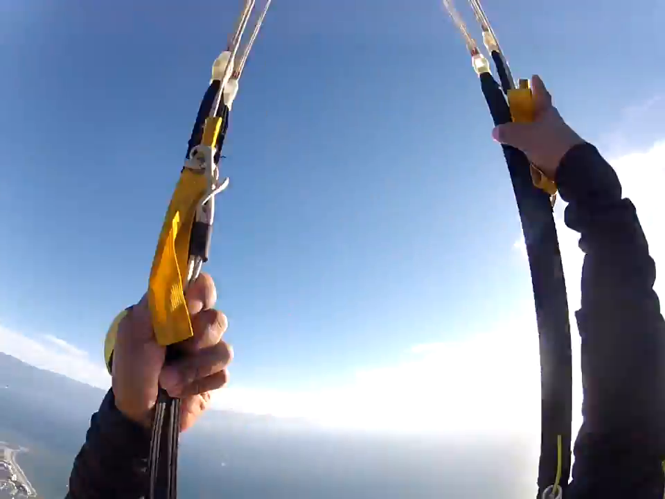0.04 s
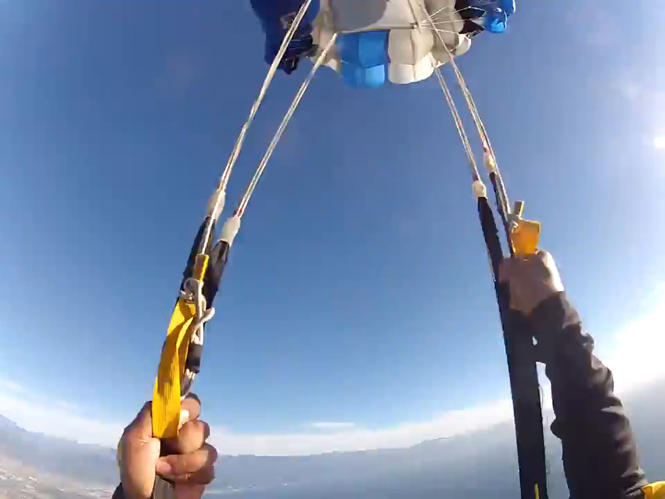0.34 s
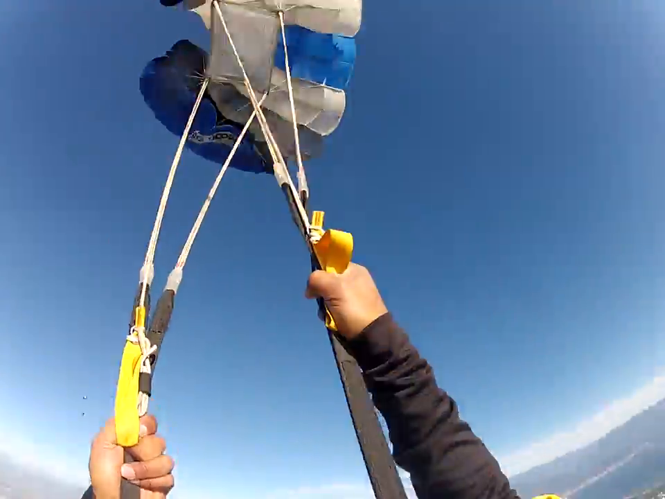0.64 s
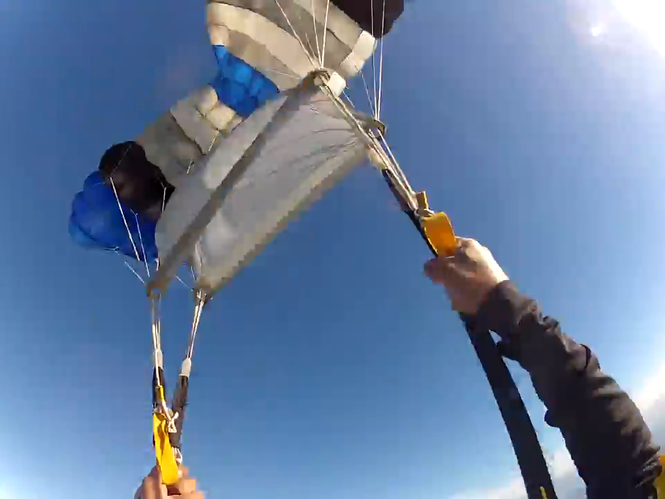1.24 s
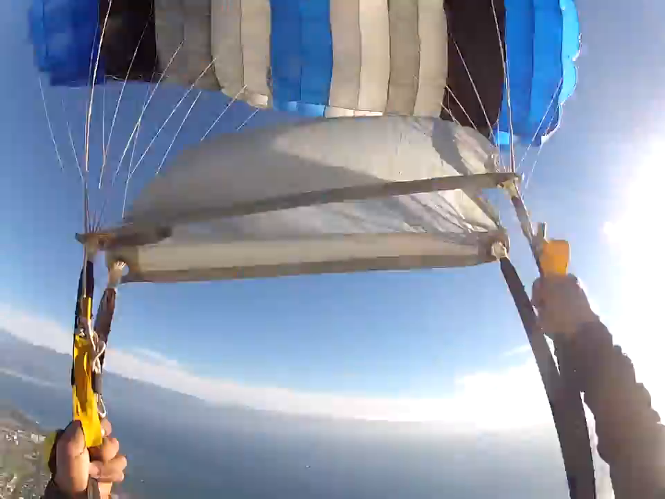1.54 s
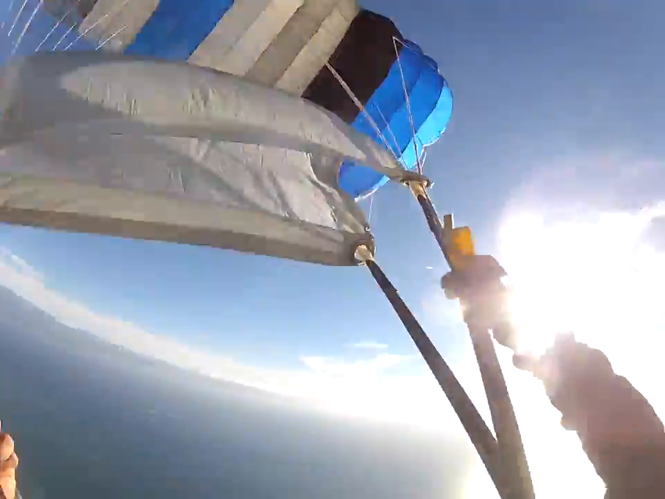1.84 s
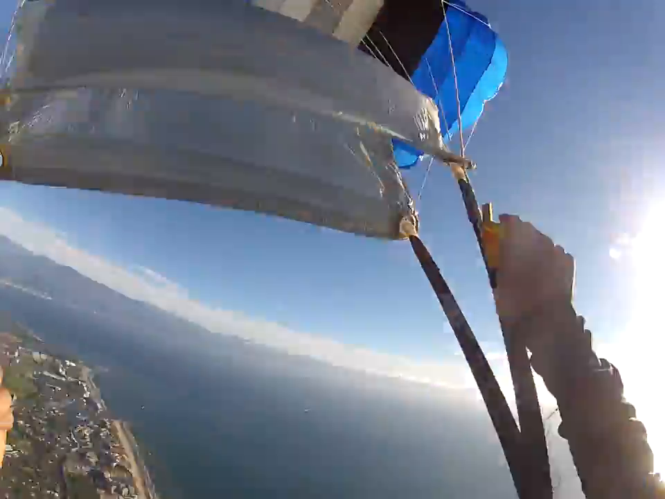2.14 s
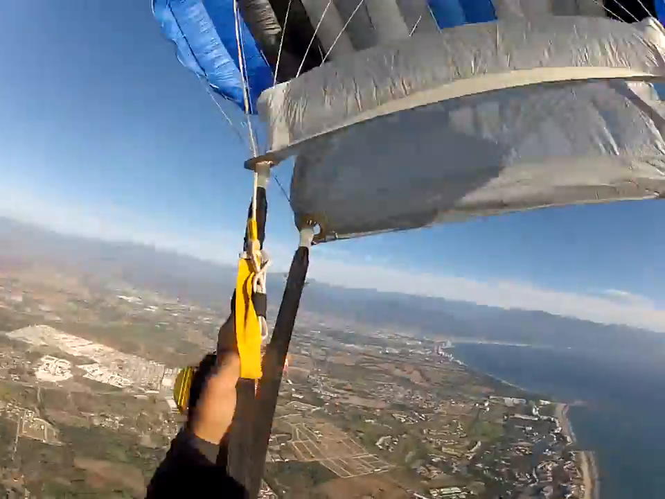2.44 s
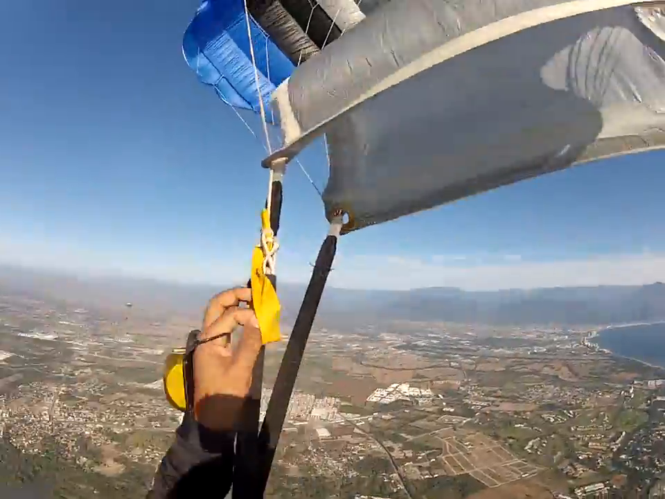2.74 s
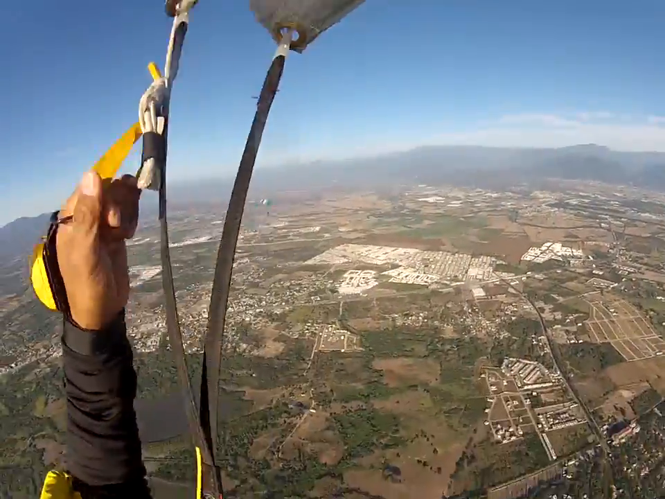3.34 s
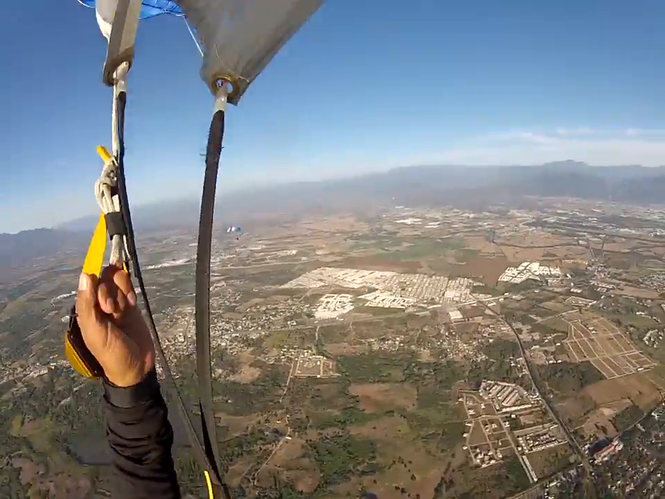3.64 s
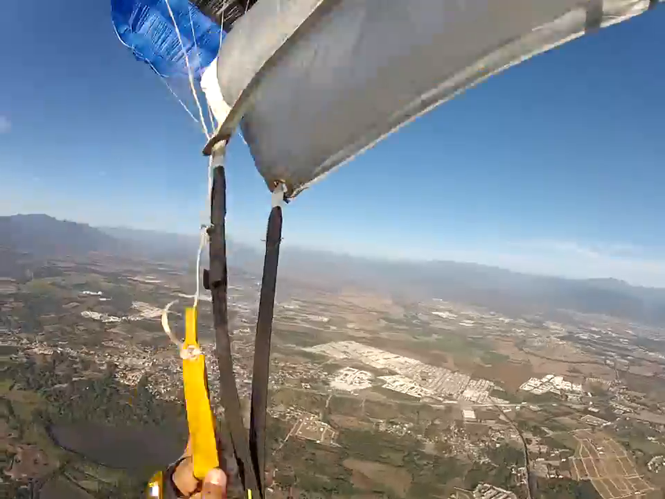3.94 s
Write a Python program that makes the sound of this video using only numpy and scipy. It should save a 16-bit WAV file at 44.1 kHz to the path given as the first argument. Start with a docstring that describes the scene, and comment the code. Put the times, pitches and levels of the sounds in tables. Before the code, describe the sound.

Wind buffets the microphone, opening with a dull thump while parachute cloth flaps and crackles. At about 0.8 seconds gear rattles sharply against the camera. The wind drops by 1.5 seconds, leaving soft rustling, strap rubs and light ticks. From around 2.8 seconds the air picks up to a steady rush with a faint whistle, and the harness knocks the helmet near 3.4 seconds.

```python
"""Under a parachute that has just opened, at one microphone in a hard camera case on the jumper's helmet.
Turbulent eddies buffet the case, and the fluttering cloth flaps, crackles and calms as the fall slows.
Gear rattles on the case and the harness bumps the helmet, exciting damped modes; straps rub, lines tick.
Then the airflow picks up again to a steady rush, singing faintly at an edge of the case."""
import sys
import numpy as np
from scipy import signal
from scipy.fft import rfft, irfft
from scipy.io import wavfile
from scipy.ndimage import uniform_filter1d

SR = 44100
rng = np.random.default_rng(int(sys.argv[2]) if len(sys.argv) > 2 else 0)


def store_pcm(level_fs):
    """Save levels as 16-bit WAV."""
    pcm = np.round(np.clip(level_fs, -1, 1) * 32767).astype(np.int16)
    wavfile.write(sys.argv[1], SR, np.atleast_2d(pcm).T)


N = 176400

# Strength of the buffeting. Each row: time in seconds, level in dB.
BUFFET_LEVELS = [(0, -16), (.08, -17.5), (.3, -17.5), (.48, -23.5), (.63, -18.5), (.71, -28), (.77, -34.5),
                 (.8, -27), (.83, -21), (.89, -22.5), (1.0, -27.5), (1.12, -34), (1.28, -31), (1.4, -31.5),
                 (1.48, -44), (1.62, -41.5), (1.8, -47), (2.02, -42), (2.19, -35.5), (2.43, -43.5),
                 (2.48, -33.5), (2.58, -45.5), (2.69, -41.5), (2.76, -30), (2.97, -30.5), (3.2, -31.5),
                 (3.34, -43), (3.6, -40), (3.73, -45.5), (3.85, -34), (3.94, -28), (4, -37)]
# Spectrum of the eddies. Each row: frequency in Hz, relative level in dB.
EDDY_SPECTRUM = [(10, -40), (22, -3), (60, 2), (100, -5), (190, -12), (290, -19.5), (420, -32),
                 (600, -32.5), (1200, -66.5)]

def buffeting(evenness=.31, swirl_db=1.8):
    """Turbulent pressure fluctuation: eddies press on the case with a rumble that follows the flow."""
    eddies = unit(colour(rng.standard_normal(N + SR), EDDY_SPECTRUM)[SR:])
    strength = np.sqrt(uniform_filter1d(eddies ** 2, size=2600))
    rumble = unit(eddies / strength ** evenness)  # partly levels out the chance swells
    return rumble * undb(swirl_db * walk(25.04)) * curve(BUFFET_LEVELS)


# Blows of air. Each row: start in seconds, peak in dB, decay time in seconds.
AIR_BLOWS = [(0.025, 2.5, 0.019), (.096, -8, 0.0075), (.82, -13.5, 0.052)]
# Spectrum of a blow. Each row: frequency in Hz, relative level in dB.
BLOW_SPECTRUM = [(20, -43), (65, 3.5), (160, 1), (280, -16.5), (600, -24.5), (6000, -64)]

def thumps(rise_s=.0012):
    """Pressure transients: sudden blows of air load the case and sound as dull thumps."""
    at, db, length = np.array(AIR_BLOWS).T
    t = np.arange(SR // 6) / SR
    push = noises(at, t) * np.minimum(t / rise_s, 1) * np.exp(-(t / length[:, None]) ** 2)
    return place(at, peaked(colour(push, BLOW_SPECTRUM), db))


# Gear striking the case. Each row: start in seconds, peak of the ringing in dB.
GEAR_KNOCKS = [(0.7995, -30), (0.814, -8.5), (0.8282, -3), (0.8375, -3), (0.8486, -13.5), (0.8545, -15),
               (0.863, -14), (0.8692, -12.5), (0.874, -11), (0.8767, -14), (0.8818, -14), (0.8838, -14)]
# Modes of the case. Each row: frequency in Hz, relative level in dB, 60 dB decay time in seconds.
CASE_MODES = [(580, -18, .03), (830, -21, .028), (1090, -10.5, .04), (1760, -1, .014), (2050, -2.5, .012),
              (2460, -11, .011), (3220, -13, .011), (4610, -18, .011), (5420, -20, .01), (6560, -21, .01),
              (10100, -7.5, .007), (13900, -10.5, .0065)]
# Spectrum of the crack of contact. Each row: frequency in Hz, relative level in dB.
IMPACT_SPECTRUM = [(400, -3.5), (600, 4), (2400, 12), (3600, -6.5), (6000, -8), (14000, -6)]

def rattle(contact_s=.0004, crack_db=-5.5, crack_fall_s=.0038):
    """Impact excitation: each blow of hard gear cracks, scrapes and rings the same modes of the case."""
    at, db = np.array(GEAR_KNOCKS).T
    t = np.arange(SR // 10) / SR
    body = ring(CASE_MODES, t) * (1 - np.exp(-t / contact_s))
    touch = contact(at, t, scrape_db=-20, scrape_s=.0016)
    ringing = signal.fftconvolve(touch, body[None], axes=1)
    crack = colour(noises(at, t) * np.exp(-t / crack_fall_s), IMPACT_SPECTRUM)
    return place(at, peaked(ringing, db)) + place(at, peaked(crack, db + crack_db))


# Strength of the flutter. Each row: time in seconds, level in dB.
FLUTTER_LEVELS = [(0, -23.5), (.08, -31.5), (.12, -27), (.19, -27.5), (.27, -34), (.35, -34), (.41, -31.5),
                  (.51, -43.5), (.56, -33), (.68, -50.5), (.78, -47.5), (.95, -55), (1.01, -34), (1.2, -52),
                  (1.38, -42), (1.56, -49.5), (1.65, -59.5), (2.0, -61.5), (2.36, -50.5), (2.65, -61.5),
                  (3.02, -45), (3.3, -47), (4, -47)]
# Spectra of fine creases and of crisp folds. Each row: frequency in Hz, relative level in dB.
CREASE_SPECTRUM = [(120, -15.5), (350, 6), (700, -5), (1200, 3.5), (2200, 5), (3100, -3), (4800, -13),
                   (7400, -14.5), (10000, -8.5), (15000, -22)]
FOLD_SPECTRUM = [(800, -2), (2500, 7.5), (3800, -2.5), (5000, -0.5), (9000, -7.5), (15000, -8.5)]
# Peaks of the rustle. Each row: centre in Hz, width in Hz, gain in dB.
RUSTLE_PEAKS = [(5400, 120, 6.5), (6560, 150, 6)]

def flutter(surge_db=2.5, crinkle_db=-9.5):
    """Superposed impulses: tiny creases merge into a surging rustle; crisper crinkles stand out."""
    creases = grains(per_s=3500, spread_db=4) * undb(surge_db * walk(130))
    crinkles = grains(per_s=90, spread_db=2.2)
    rustle = unit(colour(creases, CREASE_SPECTRUM, RUSTLE_PEAKS))
    crisp = unit(colour(crinkles, FOLD_SPECTRUM, RUSTLE_PEAKS))
    return (rustle + undb(crinkle_db) * crisp) * curve(FLUTTER_LEVELS)


# Cloth snapping taut. Each row: start in seconds, level in dB, time until the decay in seconds.
CLOTH_SNAPS = [(0.026, -16, 0.0083), (0.036, -13, 0.0097), (0.222, -21.5, 0.0079), (0.26, -21, 0.015),
               (0.388, -24, 0.0042), (1.591, -35, 0.0038), (1.770, -41.5, 0.0048), (2.196, -46, 0.0073)]

def flaps(rise_s=.0017, fall_s=.0021):
    """Sudden tension: a panel snaps taut and radiates a short burst of cloth noise."""
    at, db, length = np.array(CLOTH_SNAPS).T
    t = np.arange(SR // 8) / SR
    cloth = unit(colour(noises(at, t), CREASE_SPECTRUM, RUSTLE_PEAKS))
    envelope = np.minimum(t / rise_s, 1) * np.exp(-np.maximum(t - length[:, None], 0) / fall_s)
    return place(at, cloth * envelope * undb(db)[:, None])


# Strength of the rush. Each row: time in seconds, level in dB.
RUSH_LEVELS = [(0, -29.5), (.3, -33), (.6, -41), (.77, -48), (.92, -36.5), (1.02, -35), (1.2, -42.5),
               (1.58, -56), (1.65, -57.5), (1.85, -55), (2.2, -51), (2.38, -51), (2.66, -61.5), (2.77, -45),
               (2.95, -44.5), (3.3, -40), (4, -42.5)]
# Spectrum of the passing air. Each row: frequency in Hz, relative level in dB.
AIRFLOW_SPECTRUM = [(120, 10), (330, -0.5), (700, -2.5), (1200, 5), (1800, 2), (2400, 2.5), (3200, -8),
                    (4800, -14), (7400, -18.5), (10000, -10), (15000, -19)]

def rush(swirl_db=.6, flicker_db=.9):
    """Broadband flow noise: air streams past, its bands swirling together and flickering alone."""
    swirl = swirl_db * walk(45)
    spectrum = rfft(rng.standard_normal(N))
    hz = np.arange(1, len(spectrum) + 1) * SR / N
    octave = np.clip(np.floor(np.log2(hz / 250)), 0, 5)
    air = 0
    for k in np.unique(octave):
        band = irfft(spectrum * (octave == k), N)
        air += band * undb(swirl + flicker_db * walk(30))
    return unit(colour(air, AIRFLOW_SPECTRUM)) * curve(RUSH_LEVELS)


# Billows of the cloth. Each row: middle in seconds, level in dB, half length in seconds.
BILLOW_SWELLS = [(.11, -28.5, 0.054), (.59, -31.5, .055), (1.388, -34.5, 0.013), (2.95, -43, 0.16)]
# Spectrum of slack cloth. Each row: frequency in Hz, relative level in dB.
SLACK_SPECTRUM = [(130, -13.5), (250, 1.5), (420, -6), (1200, -46.5)]

def billows():
    """A membrane under low tension: slack cloth billows with a soft, low flap."""
    return unit(colour(rng.standard_normal(N), SLACK_SPECTRUM)) * swells(BILLOW_SWELLS)


# Harness striking the helmet. Each row: start in seconds, peak in dB, contact time in seconds.
HARNESS_BUMPS = [(1.669, -22.5, 0.00059), (2.455, -28, 0.00089), (3.4013, -16.5, 0.000014),
                 (3.4056, -18.5, 0.000054), (3.426, -23, 0.0004)]
# Modes of the helmet. Each row: frequency in Hz, relative level in dB, 60 dB decay time in seconds.
SHELL_MODES = [(65, -2, .09), (172, 1, .065), (330, -12, .03), (590, -3, .028), (880, -4, .02),
               (1200, -3, .02), (1950, -4, .012), (3600, -6, .01), (11000, -7, .006), (12800, -8, .006)]

def bumps():
    """Contact time limits bandwidth: the softer the harness meets the helmet, the duller the ring."""
    at, db, contact_s = np.array(HARNESS_BUMPS).T
    t = np.arange(SR // 6) / SR
    touch = contact(at, t, scrape_db=-23, scrape_s=.003)
    force = signal.fftconvolve(touch, t * np.exp(-t / contact_s[:, None]), axes=1)
    ringing = signal.fftconvolve(force, ring(SHELL_MODES, t)[None], axes=1)
    return place(at, peaked(ringing, db))


# Folds giving way. Each row: start in seconds, peak in dB.
BUCKLING_FOLDS = [(0.409, -22), (.54, -28), (.549, -25.5), (0.561, -26), (0.58, -41), (0.598, -21),
                  (.626, -29), (.646, -26), (2.514, -39), (2.68, -38), (2.737, -36), (2.803, -35),
                  (2.893, -32.5), (3.024, -27.5), (3.039, -29.5), (3.543, -30.5), (3.664, -31.5)]

def crackles(rise_s=.0022):
    """Buckling: a fold of stiff cloth gives way in a quick, bright burst."""
    at, db = np.array(BUCKLING_FOLDS).T
    t = np.arange(SR // 10) / SR
    folds = noises(at, t) * t * np.exp(-t / rise_s)
    return place(at, peaked(colour(folds, FOLD_SPECTRUM, RUSTLE_PEAKS), db))


# Ticks of lines and fittings. Each row: start in seconds, peak in dB.
FITTING_TICKS = [(0.1218, -11.5), (1.708, -38.5), (2.304, -34.5), (3.602, -30)]
# Spectrum of lines, fittings and straps. Each row: frequency in Hz, relative level in dB.
RIGGING_SPECTRUM = [(300, -81), (1200, 15), (2600, -40), (3900, 10.5), (5500, -15), (8300, 3.5),
                    (11000, -17), (15000, -20)]

def ticks(fall_s=.0032):
    """Damped transients: light touches of lines and fittings die away exponentially."""
    at, db = np.array(FITTING_TICKS).T
    t = np.arange(SR // 8) / SR
    touch = noises(at, t) * np.exp(-t / fall_s)
    return place(at, peaked(colour(touch, RIGGING_SPECTRUM), db))


# Straps rubbing. Each row: middle in seconds, level in dB, half length in seconds.
STRAP_STROKES = [(0.402, -29, 0.014), (1.374, -43, 0.021), (1.51, -51, 0.11), (2.35, -51, 0.062),
                 (3.025, -47, 0.028)]

def rubs():
    """Stick-slip friction: webbing slides in short, gritty strokes."""
    slips = grains(per_s=1100, spread_db=2.5)
    return unit(colour(slips, RIGGING_SPECTRUM)) * swells(STRAP_STROKES)


# Strength of the singing air. Each row: time in seconds, level in dB.
HOWL_LEVELS = [(2.7, -64), (3.05, -49), (4, -52)]

def howl(pitch_hz=1222, width_hz=170, drift=.03):
    """Edge tone: the steady airflow sings faintly at the case, its pitch wandering."""
    hz = pitch_hz * (1 + drift * walk(10))
    waver = uniform_filter1d(walk(width_hz), size=SR // 300)  # widens the tone to a narrow band
    return unit(waver * np.sin(2 * np.pi * np.cumsum(hz) / SR)) * curve(HOWL_LEVELS)


# Peaks and hollows of the camera case. Each row: centre in Hz, width in Hz, gain in dB.
CASE_RESONANCES = [(589, 42, 3), (858.6, 62, 8), (1175, 163, 4.5), (1450, 115, -2), (3754, 340, 11),
                   (6020, 286, -10), (8230, 310, 9.5), (11500, 430, -9), (12700, 400, -13),
                   (13500, 160, 11), (14460, 680, 4.5)]

def colour(x, points, peaks=()):
    """Minimum-phase filtering: a source's spectrum and peaks, as heard through the case."""
    f = np.maximum(np.arange(N + 1) * SR / (2 * N), 1)
    hz, db = np.array(points).T
    shape_db = np.interp(np.log(f), np.log(hz), db)
    for centre, width, gain in [*CASE_RESONANCES, *peaks]:
        shape_db += gain * np.exp(-((f - centre) / width) ** 2)
    cepstrum = irfft(np.log(undb(shape_db)))
    cepstrum[1:N] *= 2  # folding the cepstrum makes the filter causal
    cepstrum[N + 1:] = 0
    response = unit(irfft(np.exp(rfft(cepstrum)))[:SR // 8])
    kernel = response[None] if x.ndim == 2 else response
    return signal.fftconvolve(x, kernel, axes=-1)[..., :x.shape[-1]]


def ring(modes, t):
    """Modal superposition: a struck body sounds as a sum of damped sinusoids."""
    return sum((-1) ** k * undb(db) * np.sin(2 * np.pi * hz * t) * np.exp(-np.log(1000) * t / t60)
               for k, (hz, db, t60) in enumerate(modes))


def contact(at, t, scrape_db, scrape_s):
    """Rough contact: an impulse followed by a fading scrape."""
    return (t == 0) + undb(scrape_db) * noises(at, t) * np.exp(-t / scrape_s)


def grains(per_s, spread_db):
    """Poisson process: clicks at random times, a few much stronger than the rest."""
    sizes = undb(spread_db * np.minimum(rng.exponential(size=N), 5))
    return (rng.random(N) < per_s / SR) * sizes * rng.choice([-1, 1], N)


def noises(at, t):
    """White noise, one row for each event."""
    return rng.standard_normal((len(at), len(t)))


def walk(rate):
    """Random modulation of rms 1, gliding to a new value every 1 / rate seconds."""
    hold = max(int(SR / rate), 2)
    return unit(uniform_filter1d(rng.standard_normal(N)[np.arange(N) // hold], hold))


def curve(rows):
    """Gain over time, interpolated in decibels."""
    return undb(np.interp(np.arange(N) / SR, *np.array(rows).T))


def swells(rows):
    """Gain over time, a sum of Gaussian strokes."""
    t = np.arange(N) / SR
    return sum(undb(db) * np.exp(-((t - at) / length) ** 2) for at, db, length in rows)


def place(times, sounds):
    """Superpose short sounds at their start times."""
    out = np.zeros(N + SR)
    for at, sound in zip(times, sounds):
        start = max(int(at * SR), 0)
        out[start:start + len(sound)] += sound
    return out[:N]


def peaked(sounds, db):
    """Normalise each short sound to its peak level."""
    return sounds / np.abs(sounds).max(axis=1, keepdims=True) * undb(db)[:, None]


def unit(x):
    """Normalise to rms 1."""
    return x / np.sqrt(np.mean(x ** 2))


def undb(db):
    """Decibels to amplitude ratio."""
    return 10 ** (np.asarray(db) / 20)


def scene():
    """Linear superposition: all sources add at one microphone, the same in both channels."""
    air = buffeting() + rush() + howl()
    cloth = flutter() + flaps() + crackles() + billows()
    mono = air + cloth + thumps() + rubs() + bumps() + ticks() + rattle()
    return np.array([mono, mono])


def record(dry, top_hz=15300):
    """Saturation and band limiting: the camera clips at full scale and cuts the highest treble."""
    lowpass = signal.ellip(10, .2, 80, top_hz, fs=SR, output="sos")
    return signal.sosfilt(lowpass, np.clip(dry, -1, 1))


dry = scene()
out = record(dry)
store_pcm(out)
```